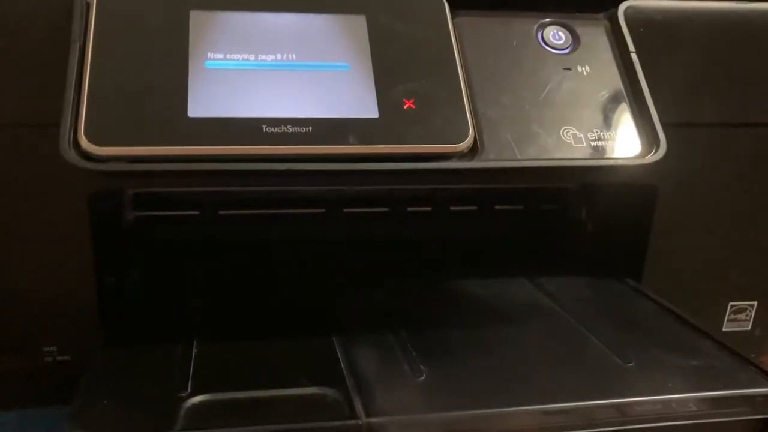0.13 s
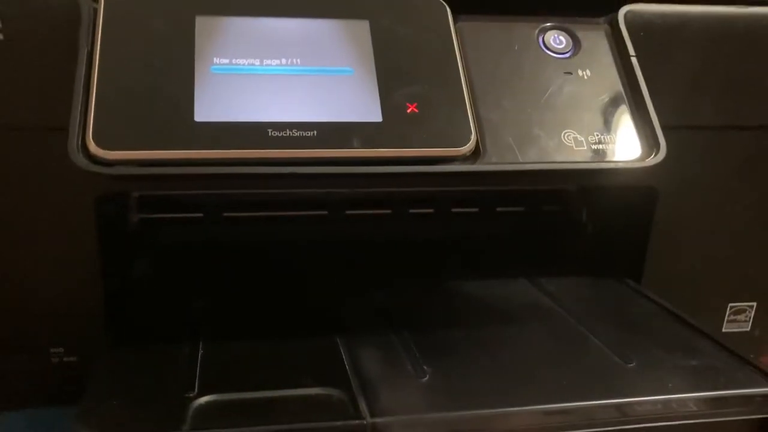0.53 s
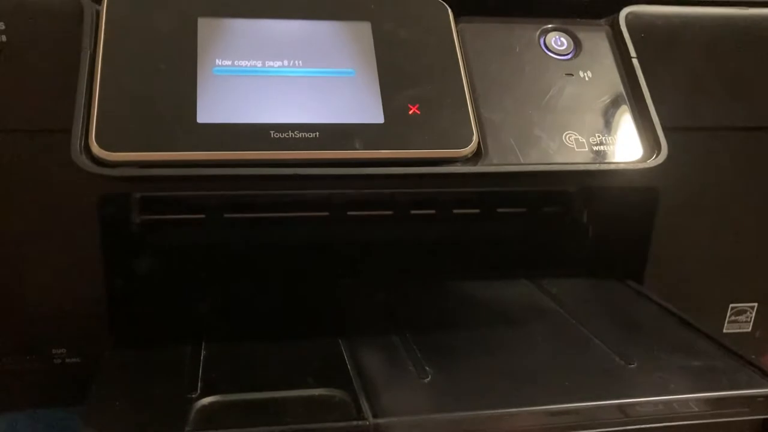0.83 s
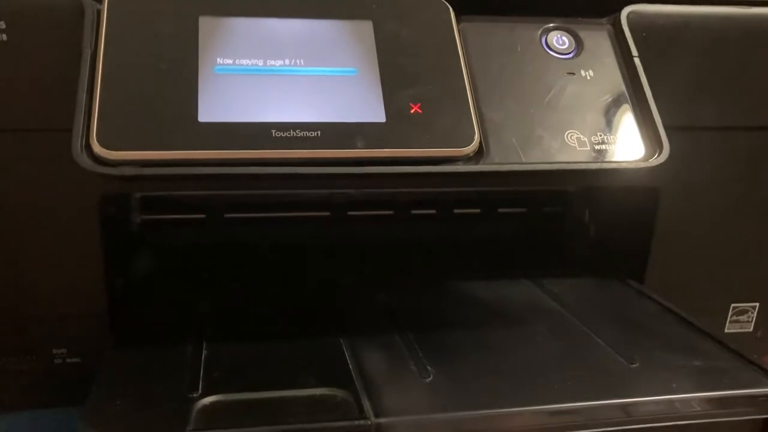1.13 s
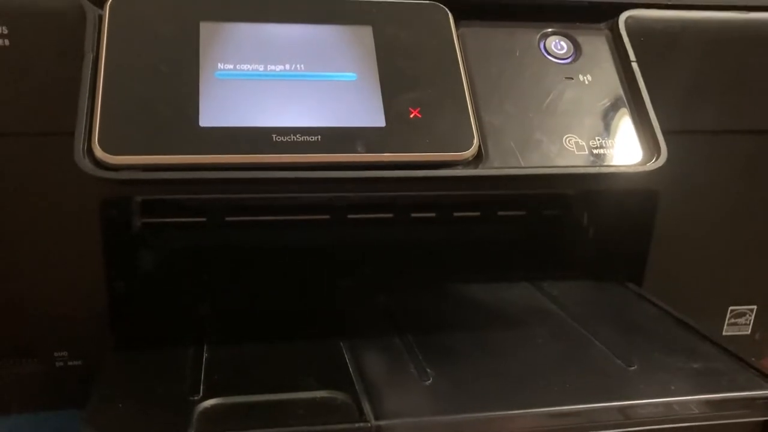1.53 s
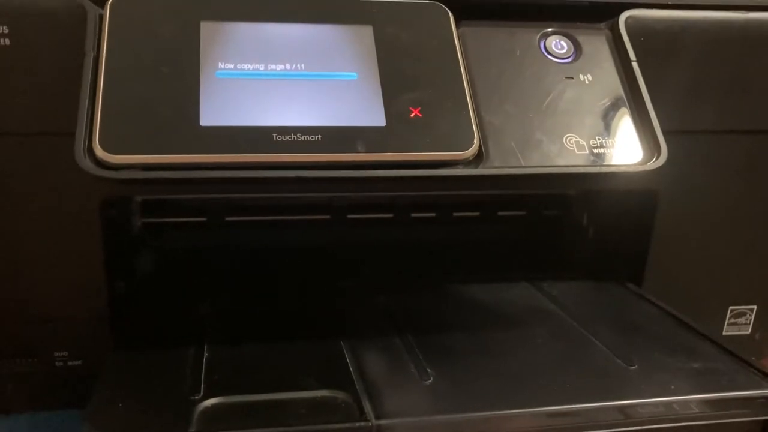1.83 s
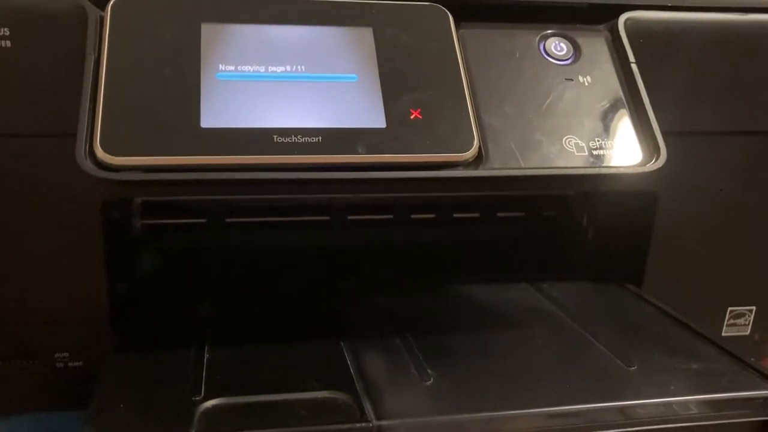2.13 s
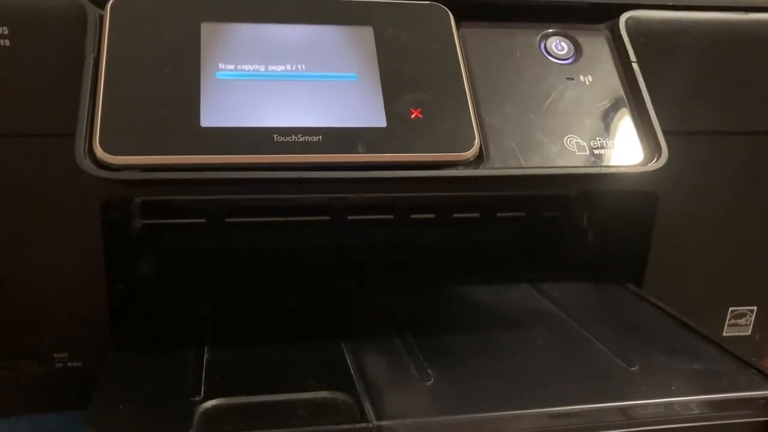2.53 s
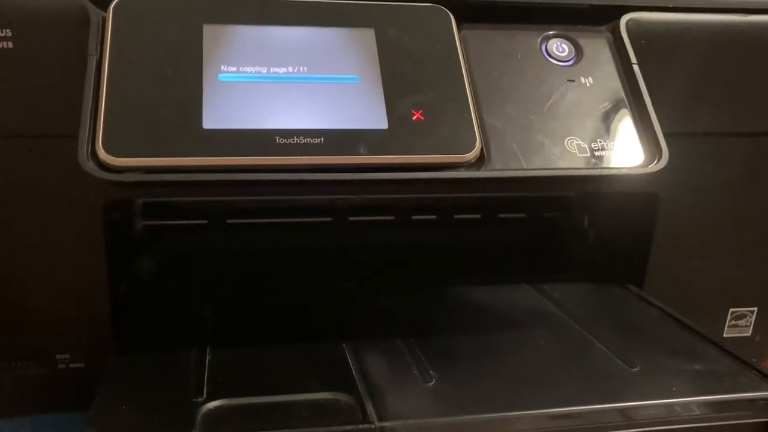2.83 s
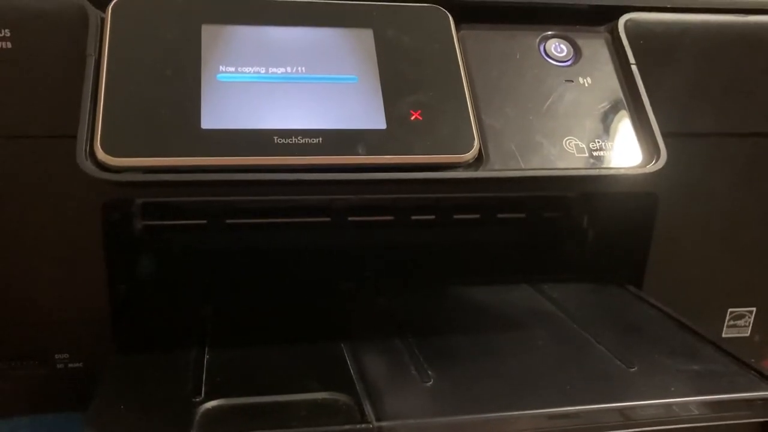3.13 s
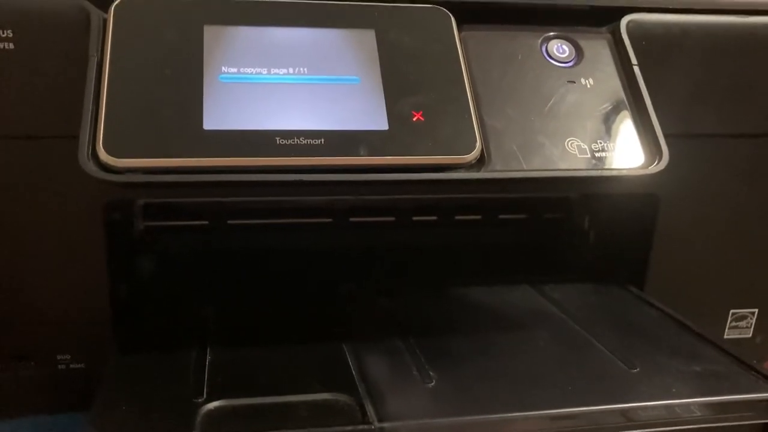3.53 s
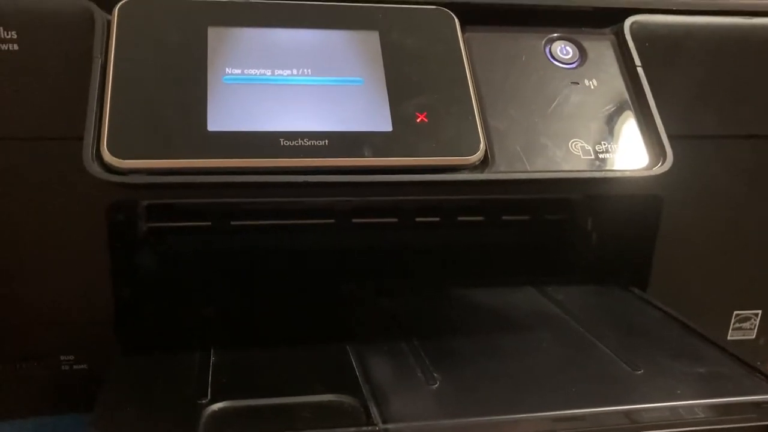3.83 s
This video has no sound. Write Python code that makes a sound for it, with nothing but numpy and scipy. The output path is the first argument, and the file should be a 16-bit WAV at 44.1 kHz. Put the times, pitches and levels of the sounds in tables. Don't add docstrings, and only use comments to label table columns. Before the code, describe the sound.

Printer mechanism rubs steadily, stops briefly, then lurches with gear rasps, sharp snaps and pulsing strokes.

```python
import sys
import numpy as np
from scipy import signal
from scipy.fft import rfft, irfft, next_fast_len
from scipy.io import wavfile
from scipy.ndimage import uniform_filter1d, map_coordinates

SR = 44100
rng = np.random.default_rng(int(sys.argv[2]) if len(sys.argv) > 2 else 0)


def rack_gain(trim_db):
    fader = np.asarray(trim_db, float)
    return 10 ** (fader / 20)


def inscribe(sig):
    pcm = np.round(np.clip(np.atleast_2d(sig).T, -1, 1) * 32767)
    wavfile.write(sys.argv[1], SR, pcm.astype(np.int16))


N = 176400

# f/Hz, width/Hz, level/dB
CASING = [(600, 77, -13), (879, 81.5, 1.5), (1487, 115, -3), (2400, 150, 4), (3620, 282, -11),
          (4226, 210, -6.5)]


def unit(x):
    return x / np.sqrt(np.mean(x ** 2) + 1e-20)


def along(points, hz):
    f, v = np.transpose(points)
    return np.interp(np.log(hz + 1), np.log(f + 1), v)


def filtered(x, response):
    m = next_fast_len(N + SR // 2)
    return irfft(rfft(x, m) * response(np.fft.rfftfreq(m, 1 / SR)), m)[..., :N]


def coloured(x, points):
    return unit(filtered(x, lambda f: rack_gain(along(points, f))))


def resonances(peaks):
    def response(f):
        return sum((-1) ** k * rack_gain(db) * 1j * f * w / (c * c - f * f + 1j * f * w)
                   for k, (c, w, db) in enumerate(peaks))
    return response


def wobble(rate):
    knots = rng.standard_normal(int(N * rate / SR) + 4)
    return map_coordinates(knots, [np.arange(N) * rate / SR])


def swelling(t, s, length, db):
    return rack_gain(db) * np.exp(-(2 * (t - s) / length) ** 2)


def grit(spread_db, flutter_db, patchy_db):
    z = signal.stft(rng.standard_normal(N), nperseg=256)[2]
    field = uniform_filter1d(rng.standard_normal(z.shape), size=3, axis=0)
    field = unit(uniform_filter1d(field, size=14, axis=1))
    noise = signal.istft(z * rack_gain(patchy_db * field), nperseg=256)[1][:N]
    flutter = wobble(60) + wobble(200)
    return noise * rack_gain(spread_db * wobble(900) + flutter_db * flutter)


def strokes(rows, power, coast_db):
    coast_t60 = 0.33
    t, gains = np.arange(N) / SR, np.zeros((2, N))
    for start, end, db, peak, rub_db in rows:
        span = slice(max(0, round(start * SR)), round(end * SR))
        top = start + np.clip(peak, .1, .9) * (end - start)
        phase = np.interp(t[span], [start, top, end], [0, .5, 1])
        arch = np.abs(np.sin(np.pi * phase)) ** power
        gains[:, span] += arch * rack_gain([[db - rub_db / 2], [db + rub_db / 2]])
    keep = rack_gain(-60 / (coast_t60 * SR))
    return np.hypot(gains, rack_gain(coast_db) * signal.lfilter([1 - keep], [1, -keep], gains))


def clicks(rows, body, ring_db, t60, crack_db, crack_t60, case_db):
    out, blows, t = np.zeros(N + SR), np.zeros(N + SR), np.arange(SR // 20) / SR
    for s, db, hz in rows:
        onset = 1 - np.exp(-t / 0.00089)
        burst = rng.standard_normal((2, len(t))) * onset * rack_gain(-60 * t / crack_t60)
        burst /= np.abs(burst).max(axis=1, keepdims=True)
        burst[1, 20] = np.linalg.norm(burst[1])
        span = slice(round(s * SR), round(s * SR) + len(t))
        out[span] += rack_gain(db + ring_db - 60 * t / t60) * np.sin(2 * np.pi * hz * t)
        out[span] += rack_gain(db + crack_db) * burst[0]
        blows[span] += rack_gain(db + case_db) * burst[1]
    direct = filtered(out[:N], lambda f: 1 / (1 + 1j * f / 5000) ** 2 * (1j * f / (1300 + 1j * f)) ** 2)
    return direct + filtered(blows[:N], resonances(body))


def hum():
    # f/Hz, width/Hz, level/dB
    modes = [(60, 25, -2), (85.9, 14, 2), (117.7, 22.3, 2), (165, 14, -3.5), (217.3, 24.8, 1),
             (287, 23.2, 0.5), (552, 85, -25), (2370, 200, -39.5)]
    # f/Hz, level/dB
    hiss_colour = [(30, -9), (380, 26), (700, 1), (2000, -5.5), (8300, -14.5), (9400, -29.5), (10500, -7),
                   (13500, -35.5)]

    def murmur(f):
        return sum(rack_gain(db) / (1 + (2 * (f - c) / w) ** 2) ** 1.15 for c, w, db in modes)
    common, apart = unit(filtered(rng.standard_normal((2, N)), murmur))
    pair = common * rack_gain([[-.5], [.5]]) + rack_gain(-14.5) * apart * [[1], [-1]]
    return rack_gain(-48.5) * pair + rack_gain(-67) * coloured(rng.standard_normal((2, N)), hiss_colour)


def fan():
    t = np.arange(N) / SR
    return rack_gain(-57 + 1.9 * wobble(5)) * np.sin(2 * np.pi * 219.3 * t + .8 * wobble(12))


def room(x):
    # f/Hz, t60/s
    decay = [(200, 0.75), (2000, 0.19), (10000, 0.052)]
    # f/Hz, level/dB
    wet = [(200, -23.5), (1000, -1.5), (2000, -8), (3300, 3.5), (5800, 1), (7000, -10), (15000, -11)]
    cavity_t60 = .075
    out, step = np.zeros((2, N + SR)), SR // 18
    noise = rng.standard_normal((N // step + 1, 2, SR // 4))
    hz, t, z = signal.stft(noise, SR, nperseg=128)
    fall = rack_gain(-60 * t / cavity_t60) + rack_gain(-11.5 - 60 * t / along(decay, hz)[:, None])
    tails = signal.istft(z * fall, SR, nperseg=128)[1]
    for k, tail in zip(range(0, N, step), tails):
        y = signal.fftconvolve(x[None, k:k + step], tail / np.linalg.norm(tail[0]), axes=1)
        out[:, k:k + y.shape[1]] += y
    return filtered(out[:, :N], lambda f: rack_gain(along(wet, f)))


def thuds():
    # t/s, length/s, level/dB
    reversals = [(1.205, 0.078, -45.5), (2.49, 0.089, -50.5), (3.184, 0.071, -36.5), (3.556, 0.1, -43),
                 (3.672, 0.072, -37), (3.826, 0.057, -42), (3.982, 0.049, -46)]
    t = np.arange(N) / SR
    swell = sum(swelling(t, s, length, db) for s, length, db in reversals)
    body = [(69.6, 21, -2.0), (215, 23.0, 1.5), (285.8, 9, 4), (543, 187, -13.5)]  # f/Hz, width/Hz, level/dB
    return swell * unit(filtered(rng.standard_normal(N), resonances(body)))


def settle():
    # t/s, decay length/s, level/dB, f/Hz, width/Hz
    rustle = (1.432, .022, -77, 3900, 700)
    s, length, db, hz, width_hz = rustle
    t = np.arange(N) / SR - s
    noise = unit(filtered(rng.standard_normal(N), lambda f: np.exp(-((f - hz) / width_hz) ** 2)))
    return rack_gain(db) * noise * (t > 0) * np.exp(-np.abs(t) / length)


def pings():
    # t/s, peak level/dB
    flicks = [(1.869, -33), (1.950, -33), (1.967, -37), (1.985, -27), (1.997, -27), (2.095, -31),
              (2.178, -26), (2.306, -24), (2.349, -28), (2.357, -44), (2.375, -35), (2.387, -31),
              (2.418, -37), (3.045, -45), (3.33, -41), (3.535, -48)]
    # f/Hz, level/dB
    colour = [(1500, -30), (4000, -12), (7000, -9), (11000, -0.5), (16000, -7.5)]
    out, t = np.zeros(N), np.arange(SR // 50) / SR
    for s, db in flicks:
        out[round(s * SR):][:len(t)] += rack_gain(db - 60 * t / .012) * rng.standard_normal(len(t))
    return filtered(out, lambda f: rack_gain(along(colour, f)))


def groans():
    # t/s, length/s, level/dB, f/Hz, width/Hz
    panels = [(1.906, .06, -40, 552, 60), (1.915, 0.067, -35.5, 1450, 90), (2.033, 0.056, -43.5, 860, 110),
              (2.036, 0.038, -36, 1480, 150), (2.136, 0.037, -48, 655, 70), (2.146, 0.055, -39.5, 1510, 80),
              (2.238, 0.053, -39.5, 795, 80), (2.235, .04, -38.5, 1480, 80), (2.28, 0.025, -42, 1600, 80),
              (2.731, .09, -43.5, 1480, 150), (2.77, 0.05, -48, 627, 60), (3.267, 0.068, -42, 1476, 120),
              (3.762, 0.1, -45, 1450, 120), (2.023, 0.02, -34, 2230, 250), (2.143, .05, -37, 2200, 298),
              (2.247, 0.055, -41, 1060, 200), (2.58, 0.098, -40, 2400, 200), (2.754, 0.053, -39, 2400, 300),
              (3.152, 0.11, -45, 2490, 150), (3.282, .05, -38.5, 2290, 250), (1.949, .02, -35, 564, 80),
              (3.854, 0.044, -43.5, 215, 30), (3.17, 0.064, -41, 285.5, 25.04),
              (3.653, 0.066, -46, 254, 50)]
    t, noise = np.arange(N) / SR, grit(spread_db=4, flutter_db=0.5, patchy_db=-0.9)
    return sum(swelling(t, s, length, db) * unit(filtered(noise, resonances([(hz, width_hz, 0)])))
               for s, length, db, hz, width_hz in panels)


def tray_knocks():
    # t/s, peak level/dB, ring f/Hz
    blows = [(0.484, -22.5, 580), (0.56, -22.5, 535), (0.897, -17.5, 662), (1.022, -32, 1344)]
    # f/Hz, width/Hz, level/dB
    tray = [(586, 80, 5), (1260, 200, -2), (1810, 260, -1.5), (3370, 600, -10)]
    return clicks(blows, tray, ring_db=-3, t60=0.11, crack_db=-13, crack_t60=.02, case_db=10.0)


def gear_ticks():
    # t/s, peak level/dB, ring f/Hz
    jumps = [(1.697, -39, 1510), (1.715, -39, 2440), (1.856, -23.5, 2360), (1.868, -18.5, 1450),
             (1.888, -18.5, 1400), (1.912, -20, 1506), (2.347, -37, 2140), (2.385, -44, 1560),
             (2.416, -43, 2390), (2.451, -42, 2400), (2.494, -28.5, 2370), (2.613, -14, 2450),
             (2.826, -28, 2290), (3.524, -36, 2350), (3.544, -24.5, 1530), (3.637, -23, 1610)]
    return clicks(jumps, CASING, ring_db=-4.0, t60=0.041, crack_db=-3, crack_t60=0.025, case_db=7)


def pawl_snaps():
    # t/s, peak level/dB, ring f/Hz
    releases = [(1.943, -8.5, 2494), (2.1895, -8.5, 3750), (2.236, -22, 2200), (2.249, -17.5, 2370),
                (3.083, -18, 4580), (3.118, -23, 4430), (3.131, -21.5, 4200), (3.399, -22.5, 2250),
                (3.884, -25.5, 4730)]
    # f/Hz, width/Hz, level/dB
    pawl = [(1400, 160, -51), (2450, 270, 2.5), (3750, 660, 0), (5100, 1200, -5.5)]
    return clicks(releases, pawl, ring_db=-0.5, t60=0.021, crack_db=2, crack_t60=0.0195, case_db=4.5)


def feed():
    # start t/s, end t/s, level/dB, place of peak/0-1, rub over grind/dB
    runs = [
        (-.05, 1.172, -38.5, 0, -1),
        (1.184, 1.215, -54.5, .3, -8),
    ]
    # f/Hz, width/Hz, level/dB
    feed_casing = [(510, 264, 0.5), (1450, 440, -1), (2440, 106, 6.5), (3515, 200, -4), (4450, 280, -7.5),
                   (7790, 900, -10)]
    # f/Hz, level/dB
    rub_colour = [(300, -8.5), (1000, -9.5), (2300, -3.5), (2900, -13), (4500, -10), (6200, -16.5),
                  (11500, -16.5), (14500, -25)]
    # f/Hz, width/Hz, depth/0-1
    dips = [(1012, 81, 0.42), (2610, 60, 0.5), (4880, 100, 0.46)]
    grind, rub = strokes(runs, power=0.026, coast_db=-38)
    gears = unit(filtered(grit(spread_db=0.0, flutter_db=0.67, patchy_db=-0.3), resonances(feed_casing)))
    sheet = coloured(grit(spread_db=2.5, flutter_db=1.0, patchy_db=1.7), rub_colour)

    def open_path(f):
        return 1 - sum(np.clip(depth, 0, .9) * np.exp(-((f - c) / w) ** 2) for c, w, depth in dips)
    return filtered(rack_gain(-5 + 0.32 * wobble(16.1)) * grind * gears + rack_gain(-4.5) * rub * sheet, open_path)


def jam():
    # start t/s, end t/s, level/dB, place of peak/0-1, rub over grind/dB
    lurches = [(1.688, 1.71, -54.5, .5, -14), (1.708, 1.795, -42, 0.24, -5.5),
               (1.795, 1.845, -45, 0.41, -1.5), (1.866, 1.96, -31, 0.73, -5.5),
               (1.95, 2.0, -39, 0.61, -1.5), (1.995, 2.072, -29, 0.46, -2), (2.075, 2.125, -39, 0.54, -3),
               (2.12, 2.19, -33, 0.33, 3), (2.185, 2.215, -42.5, .5, 4), (2.205, 2.315, -30, 0.45, 3),
               (2.345, 2.405, -43, 0.18, 3.5), (2.41, 2.44, -47.5, 0.22, 5), (2.447, 2.468, -54, .4, -3.4)]
    cycle = [(2.487, 2.648, -34.5, 0.42, 4), (2.668, 2.81, -36.5, 0.35, -3), (2.822, 2.945, -37.5, 0.35, 3),
             (3.024, 3.18, -34.5, 0.29, 3), (3.185, 3.312, -37, 0.56, -2), (3.325, 3.45, -37.5, 0.26, 0),
             (3.52, 3.55, -43.5, 0.37, -5), (3.54, 3.678, -34, 0.17, 4), (3.688, 3.812, -37, 0.74, -3.5),
             (3.82, 3.94, -37.5, 0.33, -0.5), (3.962, 4.06, -32.5, 0.78, 7)]
    # f/Hz, level/dB
    grind_colour = [(200, -16), (450, -8.5), (2500, -13), (3500, -37), (6000, -47), (16000, -31)]
    # f/Hz, level/dB
    scrape_colour = [(500, -8.5), (2500, -7), (4300, -4.5), (6200, -4.5), (7000, -5), (9300, -4),
                     (12000, -12), (15500, -20)]
    lurching = strokes(lurches, power=1.12, coast_db=-13)
    cycling = strokes(cycle, power=0.49, coast_db=-15)
    grind, rub = lurching + cycling
    gears = unit(filtered(grit(spread_db=3.5, flutter_db=0.93, patchy_db=2.5),
                          lambda f: resonances(CASING)(f) + rack_gain(along(grind_colour, f))))
    sheet = coloured(grit(spread_db=1.0, flutter_db=0.7, patchy_db=2.0), scrape_colour)
    return rack_gain(-4.5) * grind * gears + rack_gain(-3.5) * rub * sheet


def ports(x):
    # f/Hz, phase/rad
    lag = [(0, 0), (1600, -.6), (3300, -3.1), (4800, -5.7), (7000, 0), (8950, 3.14), (11550, 6.28),
           (15600, 12.5)]
    # f/Hz, level/dB
    left_db = [(60, -4), (180, 5.5), (550, -0.5), (1650, 5.5), (4970, 4), (15000, -2)]

    def pair(f):
        half = rack_gain(along(left_db, f) / 2) * np.exp(-.5j * np.interp(f, *np.transpose(lag)))
        return np.array([half, 1 / half])
    return filtered(x, pair)


def scene():
    drive = settle() + groans() + feed() + jam()
    teeth = pings() + tray_knocks() + gear_ticks() + pawl_snaps()
    return hum() + fan() + thuds() + room(drive + rack_gain(-8) * teeth) + ports(drive + teeth)


def attacks(x, count):
    energy = np.add.reduceat(filtered(x, lambda f: f > 5000) ** 2, np.arange(0, N, 128))
    before = np.roll(uniform_filter1d(energy, size=9), 5) + 1e-7
    at = np.flatnonzero(energy > before * rack_gain(2 * 8.5)) / 8
    return np.isin(np.arange(count), np.concatenate([np.floor(at), np.ceil(at)]))


def starved(x):
    # f/Hz, level/dB
    masked_db = [(5000, -20), (7000, -9), (9000, -6), (11500, -4), (14000, -2)]
    # f/Hz, level/dB
    weak_db = [(11000, -35), (13000, -17), (15000, -10.5)]
    hz, _, z = signal.stft(np.array([x[0] + x[1], x[0] - x[1]]), SR, "cosine", nperseg=2048)
    band = np.arange(len(hz)) // 16
    power = np.add.reduceat(np.abs(z) ** 2, np.arange(0, len(hz), 16), axis=1)
    centre = hz[::16, None] + 170
    masked = power[::-1] * rack_gain(2 * along(masked_db, centre))
    weak = power[:, 3:].mean((0, 1)) * rack_gain(2 * along(weak_db, centre))
    audible = power > np.maximum(masked, weak) * rack_gain(5 * rng.standard_normal(power.shape))
    keep = audible | (centre < 5000) | attacks(x[0], count=power.shape[2])
    mid, side = signal.istft(z * keep[:, band], SR, "cosine", nperseg=2048)[1][:, :N]
    return np.array([mid + side, mid - side]) / 2


def band_limit(x):
    return signal.sosfilt(signal.butter(12, 17110, fs=SR, output="sos"), x)


def record(dry):
    top_hz = 15830
    mix = filtered(dry, lambda f: np.clip((top_hz - f) / 150, 0, 1) / (1 + (42 / (f + 1)) ** 4))
    return band_limit(starved(mix))


dry = scene()
out = record(dry)
inscribe(out)
```